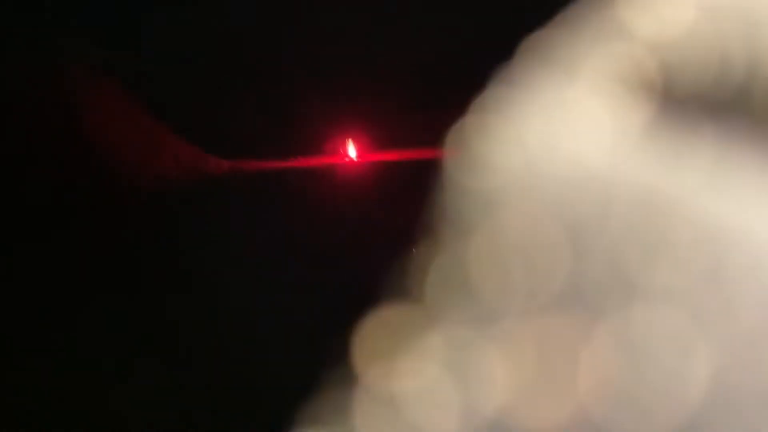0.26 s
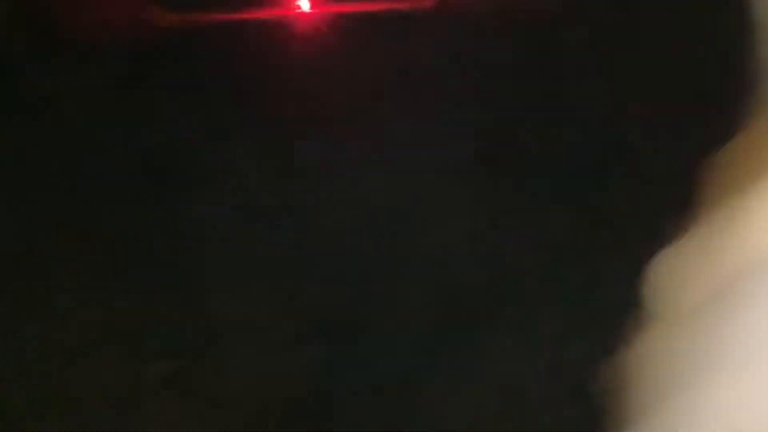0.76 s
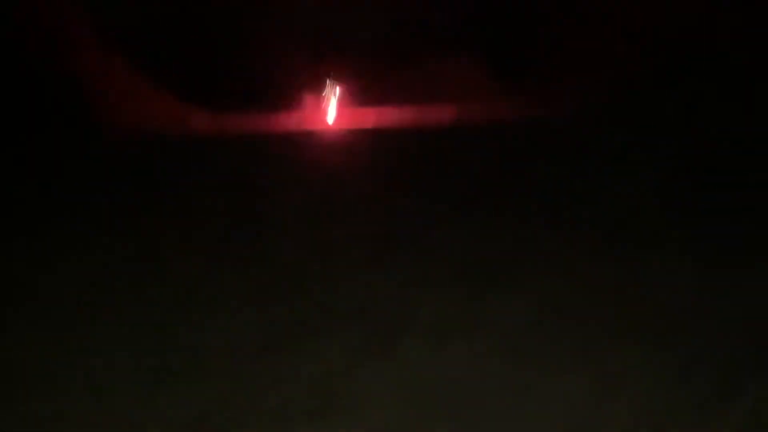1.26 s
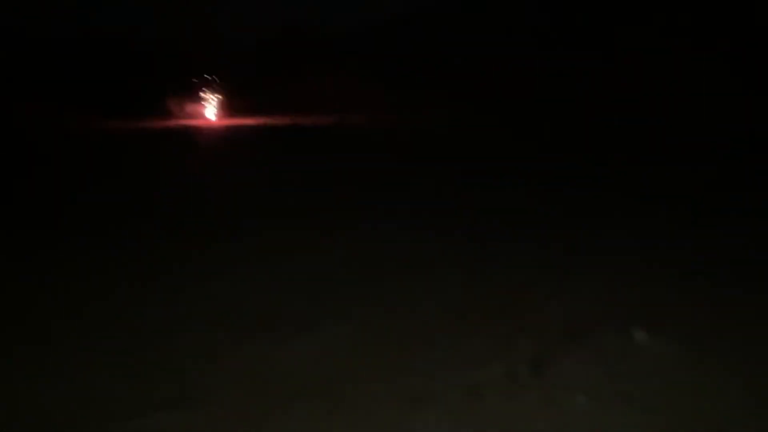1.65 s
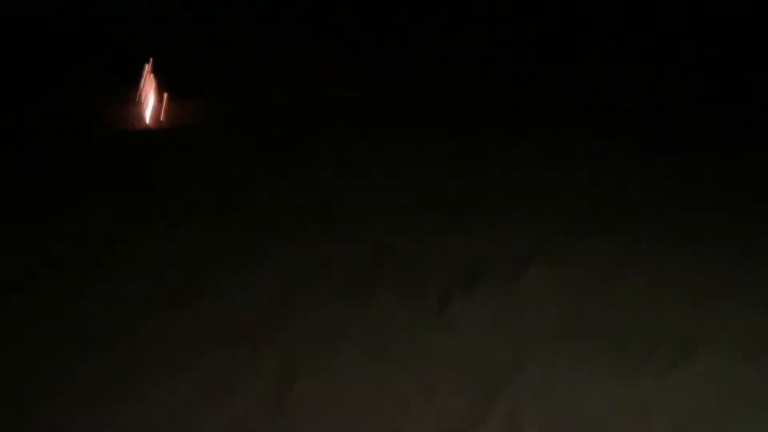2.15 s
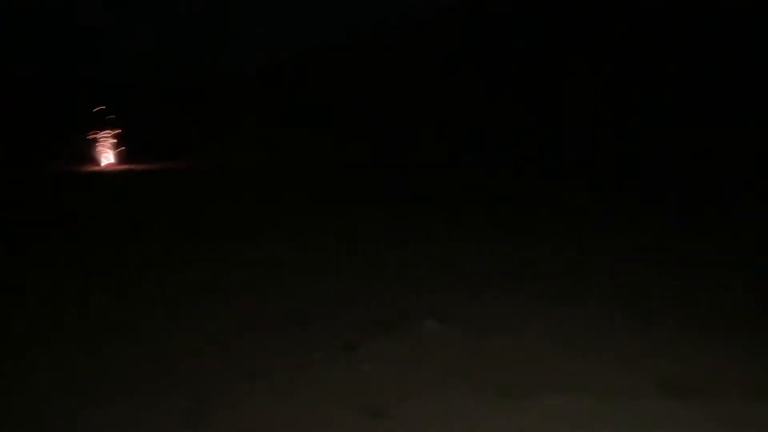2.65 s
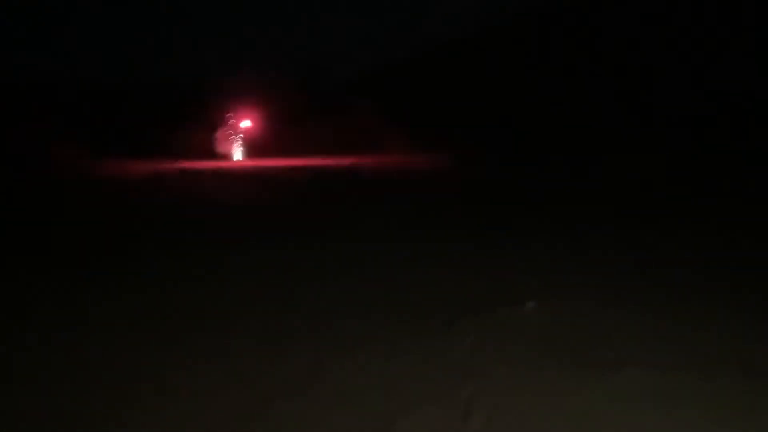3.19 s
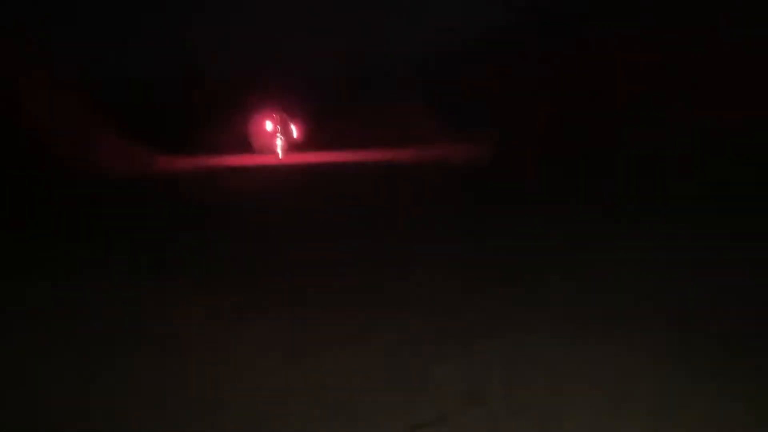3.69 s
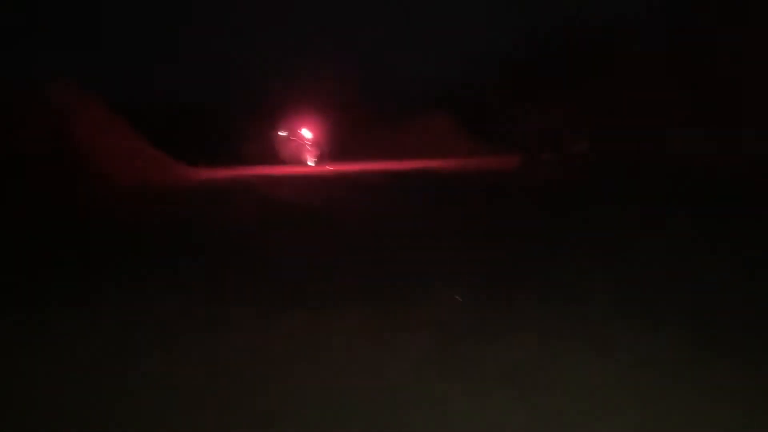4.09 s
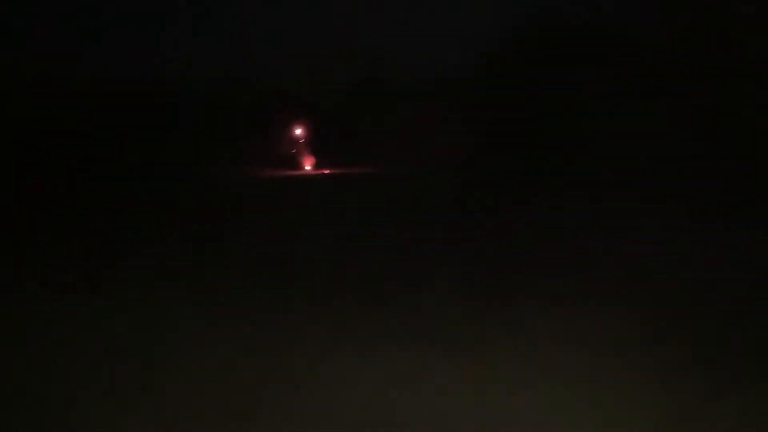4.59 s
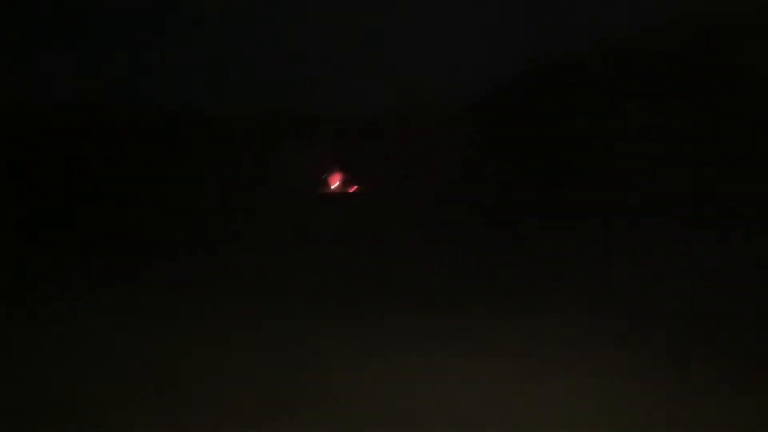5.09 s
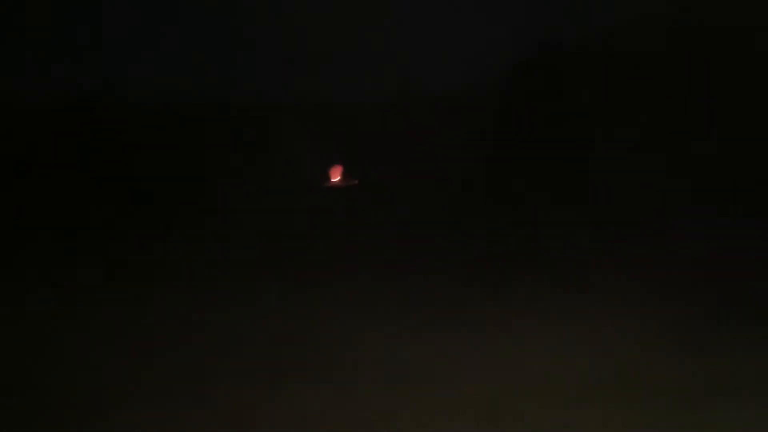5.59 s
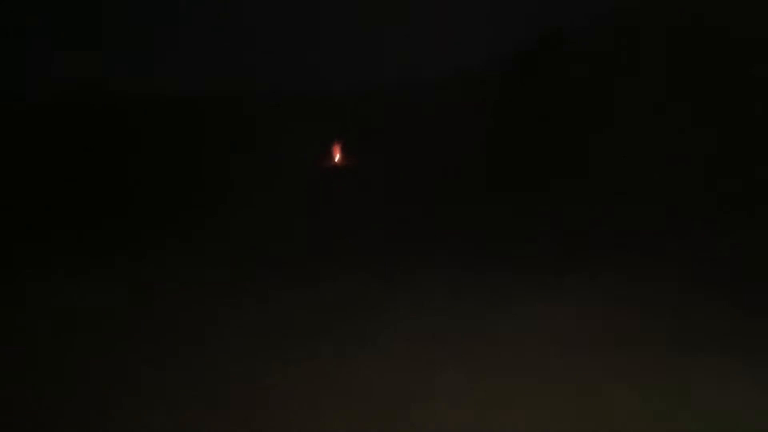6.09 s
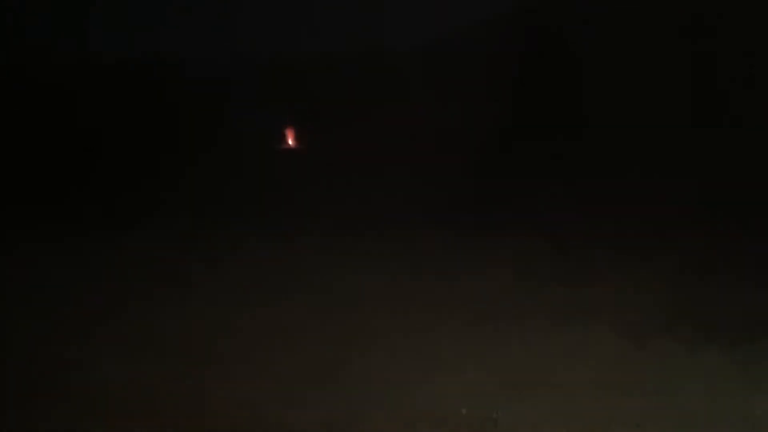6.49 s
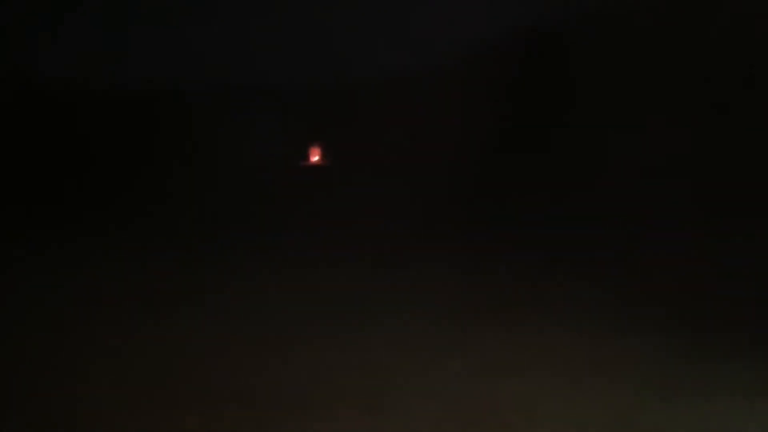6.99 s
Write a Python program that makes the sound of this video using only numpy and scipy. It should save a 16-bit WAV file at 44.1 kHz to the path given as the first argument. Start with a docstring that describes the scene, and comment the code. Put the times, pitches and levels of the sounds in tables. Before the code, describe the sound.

A ground firework burns some way off outdoors, slightly to the left, with a light echo. From about 0.3 seconds it sputters with sharp pops and fine crackle, thickest around 1 second and dying out before 2. A shrill, rough whistle emerges near 0.8 seconds and swells with a rush of hiss into its loudest shriek between 1.6 and 2.1 seconds. The note then turns smoother and keeps sliding down, quickly at first and then more slowly, falling about an octave in all. It gets raspy around 3 seconds, and the hiss brightens near 4. From 6 seconds the whistle weakens and stumbles briefly, still sounding when everything ends just after 7 seconds. Throughout, a breeze makes a low, lumpy rumble on the hand-held stereo microphone, with stronger thumps near 0.5, 1.2 and 2.7 seconds and softer ones between 5.5 and 6.

```python
"""A whistling firework at night

Some way off in the open, a ground firework sputters alight, then shrieks as its flame pulses in the tube.
The note sinks as the fuel burns down and the open tube grows longer. The flame jet hisses around it,
the surroundings throw the sound back, and a breeze buffets the hand-held stereo microphone."""
import sys
import numpy as np
from scipy import signal
from scipy.fft import rfft, irfft, next_fast_len
from scipy.io import wavfile
from scipy.ndimage import uniform_filter1d

SR = 44100
rng = np.random.default_rng(int(sys.argv[2]) if len(sys.argv) > 2 else 0)


def unload_wav(signal):
    """Save mono or channel-first audio to the path in sys.argv[1] as 16-bit WAV at rate SR, clipped to [-1, 1]."""
    wavfile.write(
        sys.argv[1],
        SR,
        np.round(np.clip(np.atleast_2d(signal).T, -1, 1) * 32767).astype(np.int16),
    )


N = 319725
TIME = np.arange(N) / SR

# The tube's sinking note. Each row: time in seconds, pitch in Hz.
NOTE_PITCH = [(0.8, 3570), (0.99, 3583), (1.35, 3398), (1.6, 3063), (1.76, 3007), (1.775, 2900),
              (1.8, 2984), (1.84, 2863), (1.98, 2806), (2.19, 2622), (2.36, 2576), (2.55, 2443),
              (2.72, 2411), (2.86, 2280), (3.19, 2279), (3.42, 2230), (3.45, 2180), (3.63, 2169),
              (3.75, 2152), (3.77, 2087), (3.85, 2158), (3.87, 2089), (4.11, 2018), (4.65, 1963),
              (5.15, 1897), (5.55, 1841), (5.565, 1819), (5.79, 1776), (5.95, 1767), (6.76, 1689),
              (7.25, 1659)]
# How the fuel burns. Each row: time in seconds, note level in dB, roughness (0 is smooth, capped at 1).
NOTE_STRENGTH = [(0.2, -72.5, 1.1), (0.5, -36.5, 1.1), (0.72, -45, 1.7), (0.98, -29.5, 0.77),
                 (1.35, -23, 0.89), (1.68, -14, 0.46), (2.0, -13.5, 0.44), (2.24, -20.5, 0.16),
                 (2.42, -20.5, 0.25), (2.6, -20, 0.37), (2.86, -24.5, 0.4), (3.08, -20.5, 0.25),
                 (3.3, -24, 0.31), (3.58, -24, 0.37), (4.0, -20.5, 0.23), (4.4, -22.5, 0.24),
                 (4.95, -21.5, 0.25), (5.5, -25, 0.35), (5.8, -23.5, 0.28), (6.1, -25.5, 0.28),
                 (6.72, -25, 0.25), (7.25, -30.5, 0.37)]
# Higher tones above the note. Each row: multiple of the pitch, level in dB.
NOTE_OVERTONES = [(2, -7.5), (3, -1.5), (4, -4.5), (5, -12.5), (6, -33), (7, -30)]
# The tone colour of the overtones. Each row: frequency in Hz, gain in dB.
OVERTONE_COLOUR = [(1000, 10), (4500, 9), (5050, 4), (5600, 2.5), (8100, -1.5), (8700, 1.5), (9400, -13.5),
                   (10100, -9), (11500, -3), (13500, -22)]
# Tones halfway between the note's multiples. Each row: multiple of the pitch, level in dB.
HALFWAY_TONES = [(0.5, -5.5), (1.5, -2.5), (2.5, -18.5), (3.5, -16)]
# Spells when strong and weak pulses take turns, which makes the halfway tones.
# Each row: centre in seconds, length in seconds, level in dB, phase drift in radians.
ALTERNATING_SPELLS = [(3.077, 0.88, -36, 0.5), (5.292, 2.13, -47, 1), (7.16, 0.89, -47.5, 1.0)]
# Moments when the note falters. Each row: time in seconds, depth in dB, length in seconds.
NOTE_DIPS = [(3.08, 6, 0.0075), (3.338, 7, 0.01), (5.428, 2, 0.08), (6.021, 7.5, 0.028), (6.386, 7, 0.013),
             (6.749, 5.5, 0.0088), (6.835, 3.5, 0.014), (7.101, 10, 0.011), (7.18, 8.5, 0.017)]
# The force of the flame jet. Each row: time in seconds, hiss level in dB, treble gain in dB.
JET_FORCE = [(0, -47.5, -7), (0.18, -67, -6), (0.38, -46.5, -6), (0.7, -48, -9.5), (1.03, -36.5, -22),
             (1.3, -25, -27), (1.62, -29.5, -16), (1.9, -30, -5), (2.25, -35, -26), (2.45, -36, -9),
             (2.68, -30.5, -4), (3.1, -34, -10), (3.48, -37.5, -14), (3.8, -31.5, -7), (4.2, -34, -5),
             (4.6, -36, -13.5), (5.33, -30, -27), (5.53, -29, -12.5), (6.1, -39.5, -16), (7.25, -42.5, -16)]
# The tone colour of the hiss. Each row: frequency in Hz, gain in dB.
HISS_COLOUR = [(200, -20), (450, 0), (750, -8), (1200, -3), (1550, 1), (2100, 0.5), (2700, -10.5),
               (3200, 0.5), (4000, -5.5), (5050, -3.5), (5800, -3.5), (8100, -10.5), (8800, -11.5),
               (10200, -1.5), (12500, -11.5), (16000, -23)]
# Raspy bands of noise, each just below a tone. Each row: that tone's multiple of the pitch, level in dB.
RASP_BANDS = [(1, -14.5), (1.5, -17.5), (2, -25), (3, -31)]
# Narrow bands of hiss that swell and fade.
# Each row: centre in seconds, length in seconds, middle frequency in Hz, level in dB.
JET_RUSHES = [(0.532, 0.28, 4200, -39), (0.77, 0.1, 9700, -41), (0.775, 0.084, 12100, -39),
              (0.777, 0.09, 14600, -45), (1.23, 0.18, 6450, -30), (1.343, 0.32, 4470, -20),
              (1.344, 0.2, 5270, -22.5), (1.792, 0.54, 4020, -19), (1.806, 0.68, 1850, -18.5),
              (1.906, 0.62, 5300, -33), (2.667, 0.28, 3400, -27), (4.053, 0.82, 7370, -27.5),
              (5.681, 0.47, 8770, -35.5)]
# Sputters as the fuel catches. Each row: start in seconds, level in dB.
FUEL_POPS = [(0.025, -33), (0.088, -31), (0.342, -25.5), (0.407, -22), (0.4313, -17.5), (0.4643, -17),
             (0.5018, -23), (0.522, -17.5), (0.5328, -15), (0.555, -13), (0.5962, -18), (0.6039, -21),
             (0.6163, -16.5), (0.6292, -17), (0.6513, -11.5), (0.685, -31), (0.713, -12.5), (0.76, -14),
             (0.7787, -13), (0.7948, -12), (0.8232, -10.5), (0.8482, -11.5), (0.8551, -22), (0.8618, -13),
             (0.8765, -10.5), (0.883, -12), (0.895, -15), (0.904, -14), (0.91, -4.5), (0.925, -8.5),
             (0.9299, -14), (0.9449, -9), (0.956, -7), (0.9619, -13), (0.9693, -17), (0.9885, -10),
             (1.0008, -11), (1.009, -5.5), (1.0296, -15), (1.045, -2), (1.0793, -6), (1.1068, -8),
             (1.128, -4), (1.1384, -11), (1.157, -6), (1.197, -26), (1.226, -31), (1.244, -13),
             (1.2664, -13), (1.301, -20), (1.315, -7.5), (1.331, -19), (1.341, -24), (1.351, -16),
             (1.4148, -28), (1.4474, -15.5), (1.503, -23), (1.559, -17.5), (1.848, -15)]
# The tone colour of the sputters. Each row: frequency in Hz, gain in dB.
SPUTTER_COLOUR = [(300, -6), (1500, -15), (2300, -17.5), (3700, 3), (5200, -3), (7000, -7), (9800, -7.5),
                  (12500, -14.5), (16000, -25)]
# The strength of the breeze. Each row: time in seconds, level in dB.
WIND_STRENGTH = [(0, -30.5), (0.22, -35.5), (0.65, -25.5), (1.15, -28), (1.38, -27.5), (1.68, -22.5),
                 (2.15, -24), (2.32, -30), (2.62, -21), (3.05, -28), (4.05, -29), (4.6, -35.5),
                 (5.1, -32.5), (5.65, -31), (6.25, -37.5), (7.25, -29)]
# The tone colour of wind on the microphone. Each row: frequency in Hz, gain in dB.
WIND_COLOUR = [(15, 10.5), (30, -19), (45, -1), (60, 6.5), (95, 2.5), (140, -2.5), (200, -9.5), (350, -14),
               (550, -20), (900, -28.5), (2000, -31), (5000, -109.5)]
# Swirls of air that hit the microphone.
# Each row: peak time in seconds, length in seconds, level in dB, middle frequency in Hz.
WIND_THUMPS = [(0.08, 0.028, -28.5, 125), (0.496, 0.03, -19.5, 337), (0.524, 0.011, -6, 340),
               (0.544, 0.012, -2.5, 296), (0.566, 0.016, -19.5, 302), (0.599, 0.0067, -12, 453),
               (0.605, 0.0051, -19, 1090), (0.617, 0.0084, -18, 790), (0.622, 0.008, -9, 168),
               (0.638, 0.028, -24, 420), (0.724, 0.0091, -25, 398), (0.787, 0.072, -20.5, 327),
               (0.916, 0.093, -21.5, 159), (1.038, 0.0083, -15, 242), (1.164, 0.012, -15, 267),
               (1.188, 0.03, -15.5, 91), (1.228, 0.019, -4.5, 137), (1.513, 0.0096, -18, 457),
               (1.674, 0.034, -25.5, 216), (2.049, 0.02, -17, 154), (2.139, 0.049, -16, 88.4),
               (2.234, 0.012, -24, 109.2), (2.609, 0.047, -17, 100), (2.689, 0.0092, -6, 390),
               (2.723, 0.036, -22.5, 223), (2.756, 0.028, -16, 80.1), (2.808, 0.006, -8.5, 257.9),
               (2.819, 0.016, -11, 142.3), (2.976, 0.032, -21, 135), (3.291, 0.022, -24.5, 194),
               (3.626, 0.023, -26.5, 191), (3.966, 0.045, -23.5, 187.1), (4.169, 0.013, -23, 126.2),
               (4.364, 0.047, -30.5, 117.5), (4.801, 0.031, -31.5, 121.1), (5.418, 0.01, -20, 202.8),
               (5.501, 0.027, -15.5, 105), (5.524, 0.0069, -18, 233), (5.8, 0.0062, -18, 219),
               (5.826, 0.021, -24, 286), (5.874, 0.029, -14, 100), (6.126, 0.029, -30, 117.9),
               (6.777, 0.05, -29.5, 120.2), (6.978, 0.021, -24.5, 171.3), (7.16, 0.03, -20.5, 85.2)]
# How far the firework's sound is ahead on the left. Each row: frequency in Hz, phase lead in radians.
FIREWORK_LEAD = [(1550, -.1), (2000, 1.35), (2200, 2.05), (2290, 2.52), (2440, 3.08), (2570, 3.45),
                 (2720, 3.52), (3000, 3.95), (3300, 4.45), (3850, 6.0), (4850, 6.1), (5200, 7.6),
                 (6200, 6.7), (7400, 7.9), (8550, 7), (8950, 9), (9800, 6.5), (16000, 6.6)]
# How far the wind's rumble and thumps lead on the left. Each row: frequency in Hz, lead in radians.
WIND_LEAD = [(50, 0.15), (140, 1.08), (260, 1.22), (420, 1.87), (600, 2.1), (780, 2)]


def whistle(loud_db=-15, shake_hz=195, restart_sharp_hz=320, settle_s=0.009, flat_hz_per_db=4):
    """The flame pulses at the tube's natural pitch; uneven burning jerks that pitch about, a rasp."""
    pitch, level_db, rough = burning()
    dip_db = faltering()
    # The note restarts sharp after a sputter and goes flat when it falters.
    sharp = restart_sharp_hz * gain_of(level_db - loud_db) * np.exp(-since_pop() / settle_s)
    flat = flat_hz_per_db * dip_db
    # The pitch shakes most when the note is both loud and rough.
    shake = shake_hz * rough ** 1.4 * gain_of(0.45 * (level_db - loud_db)) * wander(240)
    phase = 2 * np.pi * np.cumsum(pitch + sharp - flat + shake) / SR
    note = fade_in(TIME, 0.7, 0.25) * gain_of(level_db) * np.sin(phase)
    note += fade_in(TIME, 1.15, 0.25) * overtones(phase, pitch, rough)
    note += halfway_tones(phase)
    unsteady_db = np.sqrt(rough) * (wander(140) + 0.8 * wander(24))
    return np.sqrt(2) * note * gain_of(unsteady_db - dip_db)


def overtones(phase, pitch, rough, usual_jet_db=-32, blur_radians=0.06):
    """A stronger jet gives stronger overtones; rough burning weakens them."""
    force_db = follow(JET_FORCE)[0] - usual_jet_db
    drive_db = -40.5 + 1.27 * force_db - 22.5 * np.maximum(rough - 0.14, 0)
    flare_db = 9 * bell(TIME, 2.0, 0.46)  # the octave flares at the height of the shriek
    out = np.zeros(N)
    for multiple, db in NOTE_OVERTONES:
        colour_db = colour_at(OVERTONE_COLOUR, multiple * pitch) + 0.2 * wander(33)
        strength = gain_of(drive_db + db + colour_db + (multiple == 2) * flare_db)
        # The pulses vary in shape, which blurs the highest overtones most.
        out += strength * np.sin(multiple * (phase + blur_radians * wander(100)))
    return out


def halfway_tones(phase):
    """Strong and weak pulses take turns, adding in-between tones that drift most at a spell's ends."""
    strength, weighted_drift = np.zeros((2, N))
    for centre, length, db, radians in ALTERNATING_SPELLS:
        spell = gain_of(db + arch_db(TIME, centre, length, edge_db=-6.5))
        strength += spell
        weighted_drift += spell * (radians + np.minimum((2 * (TIME - centre) / length) ** 2, 2))
    drift = weighted_drift / (strength + 1e-12)
    return strength * sum(gain_of(db + 0.2 * wander(46)) * np.sin(multiple * phase + drift * wander(41))
                          for multiple, db in HALFWAY_TONES)


def burning(t=TIME):
    """The note's pitch, level and roughness as the fuel burns, at the times t."""
    level_db, rough = follow(NOTE_STRENGTH, t)
    return follow(NOTE_PITCH, t)[0], level_db, np.clip(rough, 0, 1)


def faltering(stumbles_per_s=19, stumble_db=2.3, stumble_s=0.015):
    """How far the note sags, in dB: a few longer or deeper dips and many small stumbles of the flame."""
    t = np.arange(-2 * stumble_s, 2 * stumble_s, 1 / SR)
    depths = (rng.random(N) < stumbles_per_s / SR) * stumble_db * (0.5 + rng.random(N))
    stumbles = signal.oaconvolve(depths, bell(t, 0, stumble_s), "same")
    dips = sum(db * bell(TIME, centre, length) for centre, db, length in NOTE_DIPS)
    return stumbles - stumbles.mean() + dips


def flame_strength(lowest=0.1, recover_s=0.013):
    """Each sputter all but blows the flame out; it quickly builds up again."""
    return 1 - (1 - lowest) * np.exp(-(since_pop() / recover_s) ** 2)


def since_pop(delay_s=0.0024):
    """Seconds since a sputter last knocked the flame back."""
    starts = np.append(-1, np.array(FUEL_POPS)[:, 0] + delay_s)
    return TIME - starts[np.searchsorted(starts, TIME) - 1]


def jet(patchy_db=2.5, flicker_db=3.5, spit_db=5.5):
    """Churning gas roars just below the note, with a hollow band lower down, rushes, rasp and hiss."""
    # Split noise into a grid of frequencies and moments, so each spot can get its own level.
    hz, t, grid = signal.stft(rng.standard_normal(N), SR, nperseg=512, noverlap=384)
    hz = hz[:, None]
    pitch, note_db, rough = burning(t)
    roar = 2 * gain_of(note_db - 11.5 + 8 * rough) * band(hz, pitch - 110, 230)
    hollow_db = -20.5 + swell_db(t, 1.69, 2.47, rise_db_per_s=36, fade_db_per_s=15)
    hollow = gain_of(hollow_db) * band(hz, 1220, 110)
    rushes = sum(gain_of(db + arch_db(t, centre, length)) * band(hz, middle, 0.076 * middle)
                 for centre, length, middle, db in JET_RUSHES)
    power = roar ** 2 + hollow ** 2 + rushes ** 2 + rasp(hz, t, pitch) ** 2 + hiss(hz, t, pitch) ** 2
    patches = uniform_filter1d(rng.standard_normal(grid.shape), size=6, axis=0)
    patches = unit_level(uniform_filter1d(patches, size=24, axis=1))
    grid = grid * np.sqrt(power) * gain_of(patchy_db * patches)
    gas = signal.istft(grid, SR, nperseg=512, noverlap=384)[1][:N]
    uneven = burning()[2]  # rough burning makes the gas flicker and spit
    return gas * gain_of(uneven * (flicker_db * wander(31) + spit_db * uneven * wander(990)))


def rasp(hz, t, pitch):
    """The strength of the noisy bands beside the tones, while the pulses alternate most."""
    below = sum(gain_of(db) * band(hz, multiple * pitch - 320, 59) for multiple, db in RASP_BANDS)
    above = gain_of(-14) * band(hz, pitch + 170, 65)
    return (below + above) * gain_of(arch_db(t, centre=2.99, length=0.69))


def hiss(hz, t, pitch):
    """The strength of the jet's hiss, which gathers at the tube's higher resonances."""
    force_db, treble_db = follow(JET_FORCE, t)
    multiple = hz / pitch
    ripple_db = 0.6 * fade_in(t, 1, 1) * np.cos(2 * np.pi * multiple)
    # Once the pulses alternate, it gathers at the halfway tones too.
    ripple_db += 3.5 * fade_in(t, 2.57, 0.2) * np.cos(4 * np.pi * multiple)
    top_db = treble_db * np.clip((hz - 7500) / 3200, 0, 1)
    return gain_of(force_db - 3.5 + colour_at(HISS_COLOUR, hz) + top_db + ripple_db)


def sputter(flame, snap_s=0.00017, spit_s=0.003, peak_crackles_per_s=420, alike=0.8):
    """Grains of fuel burst, each a sharp snap with a spit of gas: loud pops over a fine crackle."""
    t = np.arange(512) / SR
    shape = np.exp(-t / snap_s) + 0.16 * np.exp(-t / spit_s)
    pops = np.zeros((2, N))
    for start, db in FUEL_POPS:
        pop = noise_pair(len(t), alike) * shape
        pop /= np.linalg.norm(pop, axis=1, keepdims=True)
        add(pops, start + 0.001124, 2 * gain_of(db + 7) * pop)
    busy_db = swell_db(TIME, 1, 1.5, rise_db_per_s=25, fade_db_per_s=38)
    crackles_per_s = peak_crackles_per_s * gain_of(1.1 * busy_db)
    sizes = gain_of(-21.5 + busy_db + 4 * np.minimum(rng.exponential(1, N), 3))
    grains = (rng.random(N) < crackles_per_s / SR) * sizes * flame
    crackle = signal.oaconvolve(grains, shape / np.linalg.norm(shape))[:N] * noise_pair(N, alike)
    crackle = filtered(crackle, lambda f: low_pass(f, 8000, 4))
    return filtered(pops + crackle, lambda f: gain_of(colour_at(SPUTTER_COLOUR, f)))


def tick(start_s=0.6645, hz=8350, level_db=-15, ring_s=0.00072):
    """One bright, briefly ringing tick among the sputters."""
    t = np.maximum(TIME - start_s, 0)
    return gain_of(level_db) * np.sin(2 * np.pi * hz * t) * np.exp(-t / ring_s)


def echoes(sound, die_away_s=0.83, echo_db=-15, side_db=-25, echoes_per_s=900):
    """The ground and surroundings throw the sound back; only the treble differs from left to right."""
    t = np.arange(SR) / SR
    bounces = rng.standard_normal((2, SR)) * (rng.random((2, SR)) < echoes_per_s / SR)
    bounces *= gain_of(-60 * t / die_away_s) * (t > 0.006)
    bounces /= np.linalg.norm(bounces, axis=1, keepdims=True)
    shared, side = signal.fftconvolve(sound[None], bounces, axes=1)[:, :N]
    side = gain_of(side_db) * filtered(side, lambda f: 1 - low_pass(f, 5200, 6))
    return gain_of(echo_db) * shared + np.array([side, -side])


def wind(lumpy_db=3.5):
    """The breeze churns at the microphone and makes a low, lumpy rumble."""
    rumble = filtered(noise_pair(N, alike=0.69), lambda f: gain_of(colour_at(WIND_COLOUR, f)))
    return unit_level(rumble * gain_of(lumpy_db * wander(19))) * gain_of(follow(WIND_STRENGTH)[0])


def buffets(grit_db=2.5, case_hz=1200, overload=0.75):
    """Swirls of air thump the microphone; quick ones reach higher and ring its case on the right."""
    out = np.zeros((2, N))
    for peak, length, db, hz in WIND_THUMPS:
        t = np.arange(-2 * length, 2 * length, 1 / SR)
        slope_s = length * np.where(t < 0, 0.3, 0.6)  # quick rise, slower fall
        thump = noise_pair(len(t), alike=0.9) * np.exp(-abs(t) / slope_s)
        thump = filtered(thump, lambda f: (1 - low_pass(f, 1.05 * hz, 2))
                         * low_pass(f, hz, 3.62) * low_pass(f, 1700, 6))
        thump *= np.sqrt(length * SR / (thump ** 2).sum(1, keepdims=True))
        add(out, peak - 2 * length, gain_of(db - 5.5) * thump)
    out *= gain_of(grit_db * wander(140))
    case_db = np.array([[-1], [10]])  # left, right
    out = filtered(out, lambda f: gain_of(case_db * band(f, case_hz, 350)))
    out = overload * np.tanh(out / overload)  # the hardest thumps softly overload the microphone
    return filtered(out, lambda f: low_pass(f, 2400, 8))


def left_dip(pair, dip_db=-7):
    """The left side is quieter in one narrow band near 5 kHz."""
    left = filtered(pair[0], lambda f: gain_of(dip_db * band(f, 5050, 200)))
    return np.array([left, pair[1]])


def delay_right(pair, lead):
    """Holds back the right side's waves, so the left side leads."""
    right = filtered(pair[1], lambda f: np.exp(-1j * colour_at(lead, f)))
    return np.array([pair[0], right])


def gain_of(db):
    """Turns decibels into a number to multiply by."""
    return 10 ** (np.asarray(db) / 20)


def unit_level(x):
    """Scales a signal to an average power of 1."""
    return x / np.sqrt(np.mean(abs(x) ** 2) + 1e-20)


def follow(rows, t=TIME):
    """Joins a table's rows with straight lines and reads each column at the times t."""
    times, *columns = np.transpose(rows)
    return [np.interp(t, times, column) for column in columns]


def colour_at(rows, hz):
    """Reads a frequency table at hz, giving every octave equal room."""
    frequencies, values = np.transpose(rows)
    return np.interp(np.log(hz + 1), np.log(frequencies + 1), values)


def filtered(x, response):
    """Multiplies each frequency in x by response(frequency)."""
    size = x.shape[-1]
    padded = next_fast_len(size + 4096)
    return irfft(rfft(x, padded) * response(np.fft.rfftfreq(padded, 1 / SR)), padded)[..., :size]


def band(hz, middle_hz, width_hz):
    """1 at the middle frequency, one half at width_hz to either side."""
    return 1 / (1 + ((hz - middle_hz) / width_hz) ** 2)


def low_pass(hz, edge_hz, steepness):
    """Near 1 for low frequencies, falling towards 0 past the edge."""
    return 1 / (1 + (hz / edge_hz) ** steepness)


def wander(rate_hz):
    """A random wobble of typical size 1, up to about rate_hz fast."""
    return unit_level(filtered(rng.standard_normal(N), lambda f: low_pass(f, rate_hz, 2)))


def noise_pair(size, alike):
    """Left and right white noise: unrelated when alike is 0, the same when it is 1."""
    left, other = rng.standard_normal((2, size))
    return np.array([left, alike * left + np.sqrt(1 - alike ** 2) * other])


def add(mix, start_s, sound):
    """Mixes a sound in at start_s."""
    part = mix[..., max(round(start_s * SR), 0):][..., :sound.shape[-1]]
    part += sound[..., :part.shape[-1]]


def fade_in(t, start, length):
    """A straight climb from 0 to 1."""
    return np.clip((t - start) / length, 0, 1)


def bell(t, centre, length):
    """A smooth bump of height 1."""
    return np.exp(-(2 * (t - centre) / length) ** 2)


def arch_db(t, centre, length, edge_db=-10):
    """0 dB at the centre, falling to edge_db half a length to either side."""
    return edge_db * (2 * (t - centre) / length) ** 2


def swell_db(t, start, end, rise_db_per_s, fade_db_per_s):
    """Rises to 0 dB at start, holds until end, then fades."""
    return -rise_db_per_s * np.maximum(start - t, 0) - fade_db_per_s * np.maximum(t - end, 0)


def scene():
    """The firework and its echoes arrive from afar; the wind strikes the microphone directly."""
    flame = flame_strength()
    firework = flame * (whistle() + jet()) + sputter(flame)
    distant = left_dip(firework + tick() + echoes(firework.mean(0)))
    return delay_right(distant, FIREWORK_LEAD) + delay_right(wind() + buffets(), WIND_LEAD)


def record(dry, low_cut_hz=38, top_hz=16300, fade_s=0.005):
    """Trims the deepest rumble and the highest treble, and fades both ends."""
    sound = filtered(dry, lambda f: 1 - low_pass(f, low_cut_hz, 4))
    sound *= fade_in(np.minimum(TIME, TIME[-1] - TIME), 0, fade_s) ** 2
    treble_cut = signal.firwin(511, top_hz, window=("kaiser", 9), fs=SR)
    return signal.oaconvolve(sound, treble_cut[None], "same")


dry = scene()
out = record(dry)
unload_wav(out)
```